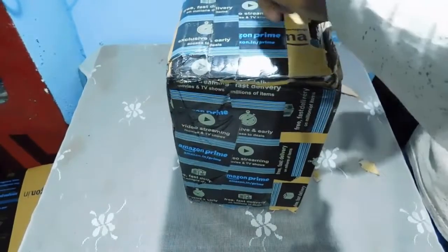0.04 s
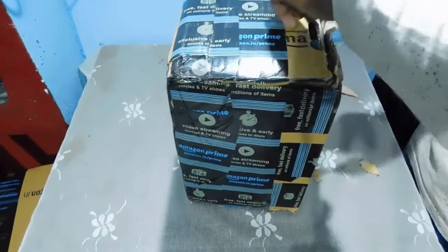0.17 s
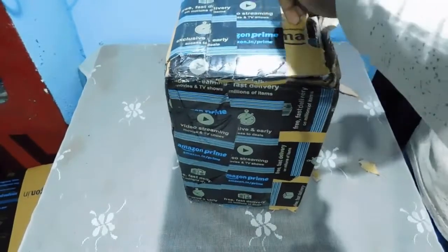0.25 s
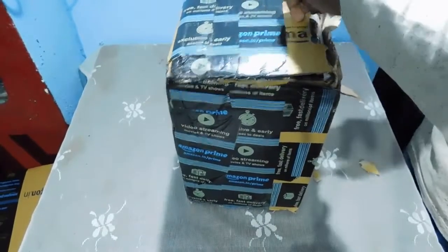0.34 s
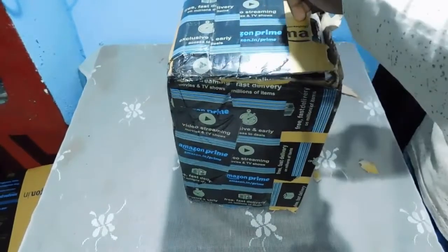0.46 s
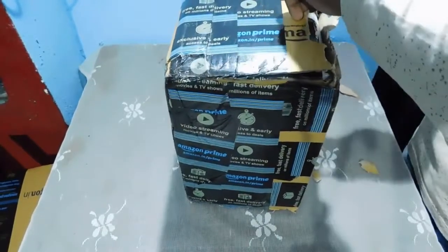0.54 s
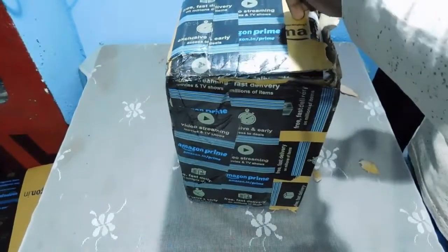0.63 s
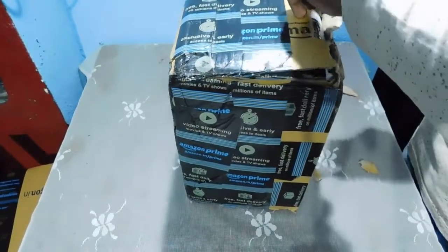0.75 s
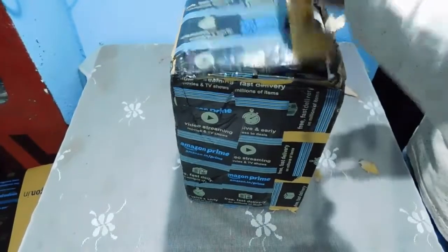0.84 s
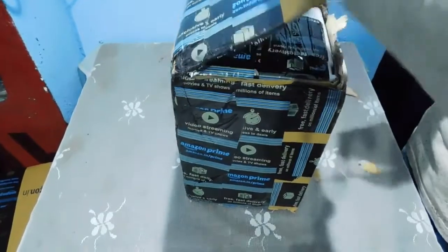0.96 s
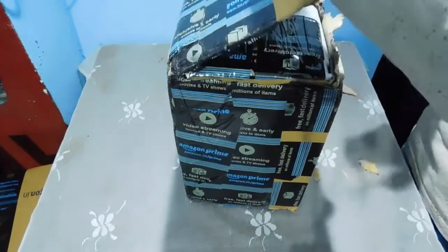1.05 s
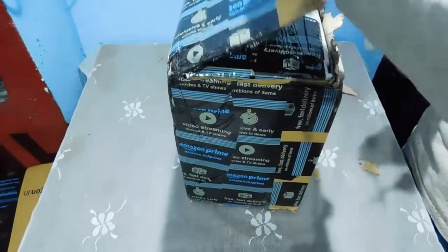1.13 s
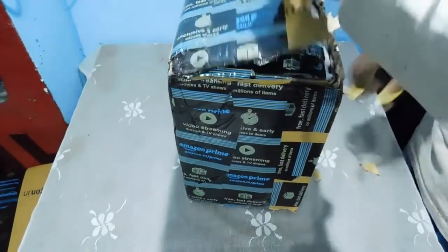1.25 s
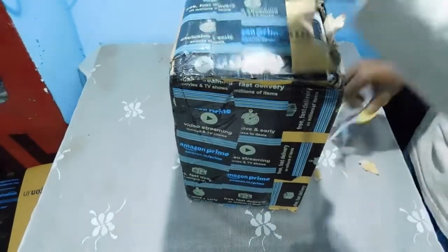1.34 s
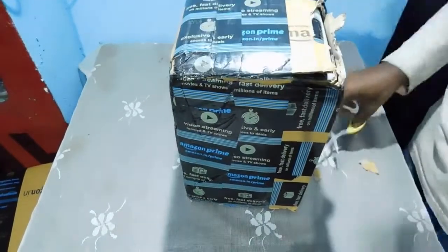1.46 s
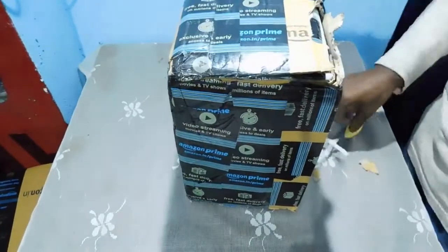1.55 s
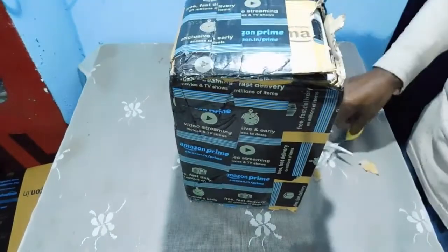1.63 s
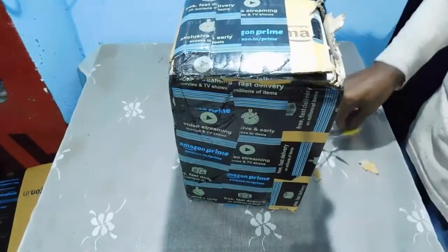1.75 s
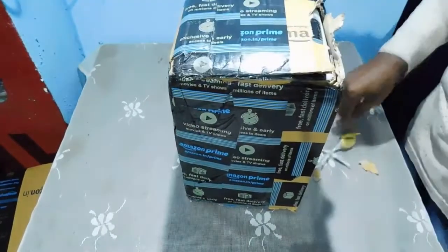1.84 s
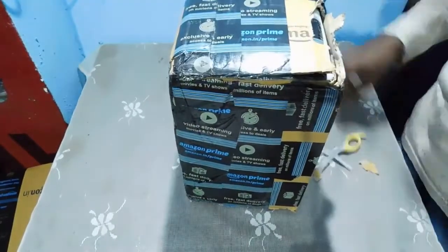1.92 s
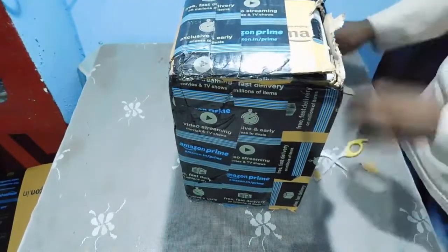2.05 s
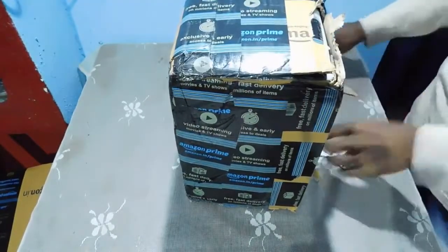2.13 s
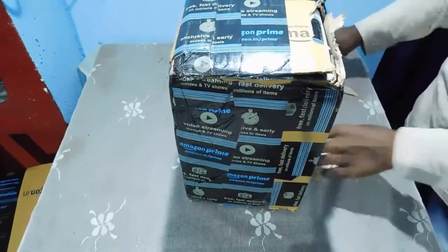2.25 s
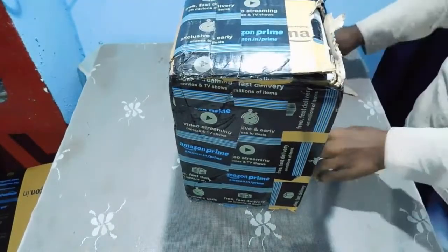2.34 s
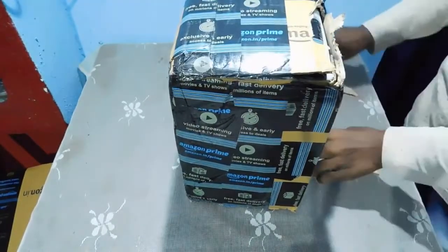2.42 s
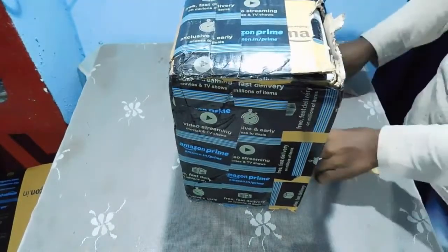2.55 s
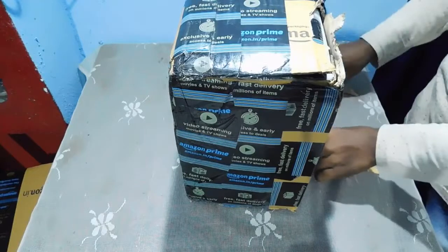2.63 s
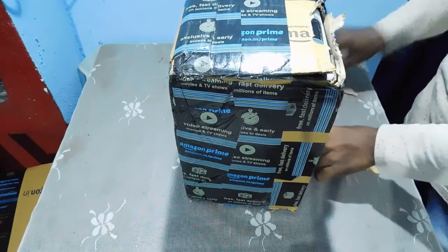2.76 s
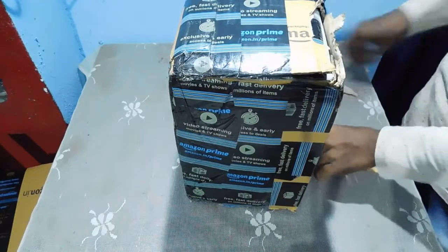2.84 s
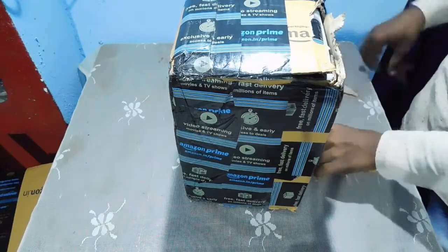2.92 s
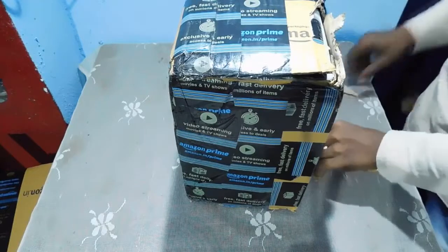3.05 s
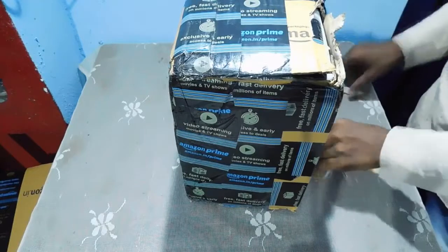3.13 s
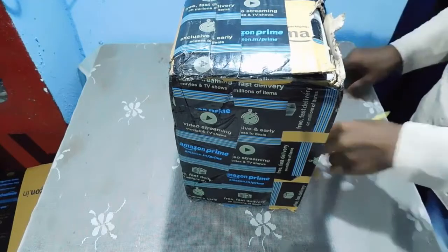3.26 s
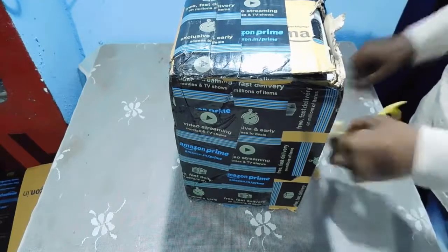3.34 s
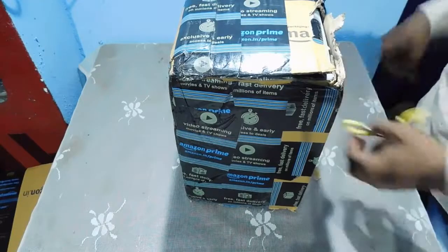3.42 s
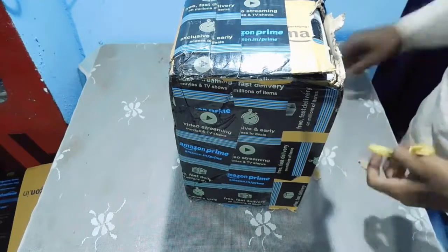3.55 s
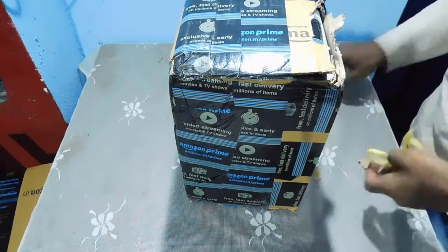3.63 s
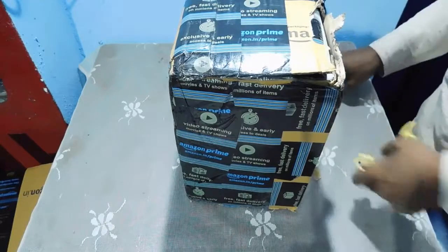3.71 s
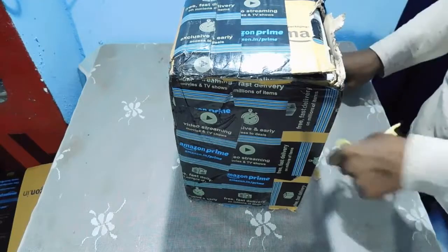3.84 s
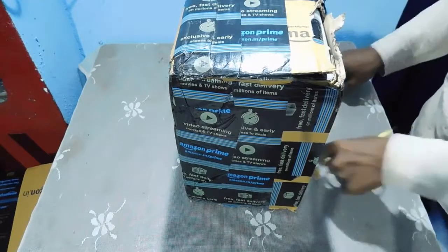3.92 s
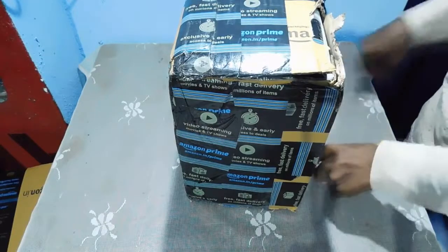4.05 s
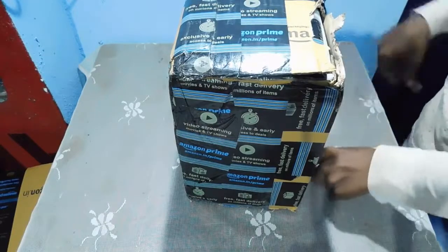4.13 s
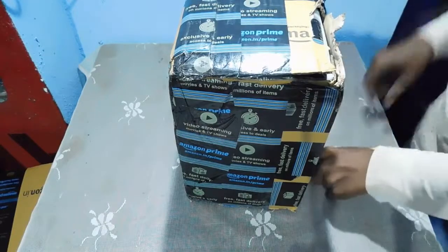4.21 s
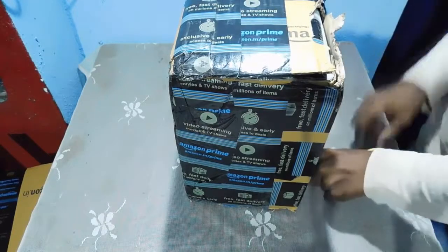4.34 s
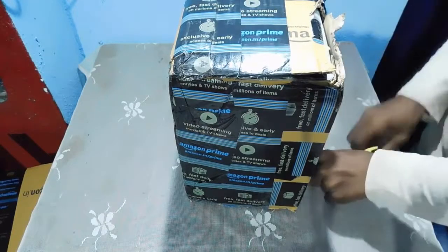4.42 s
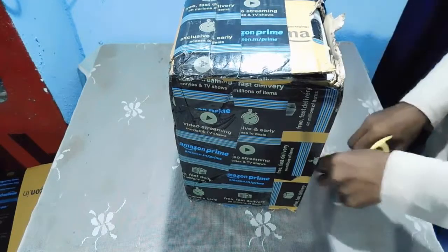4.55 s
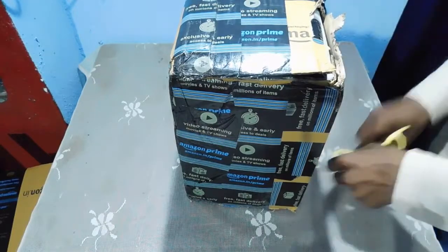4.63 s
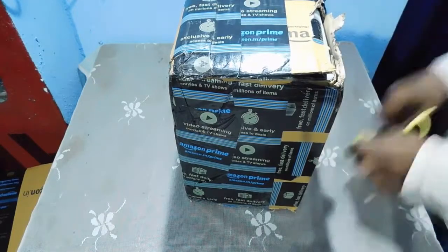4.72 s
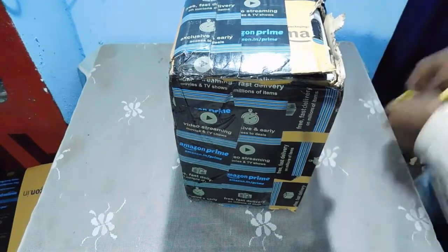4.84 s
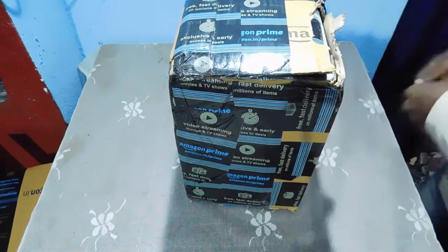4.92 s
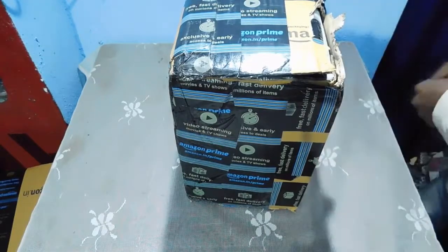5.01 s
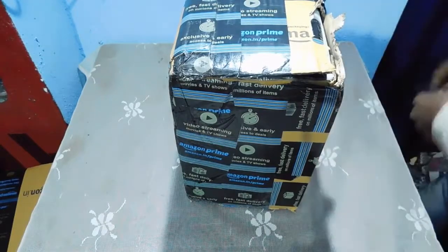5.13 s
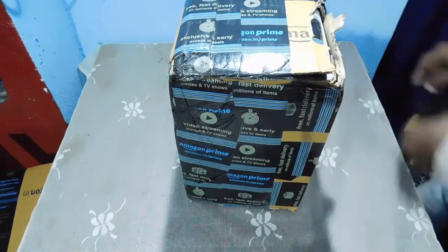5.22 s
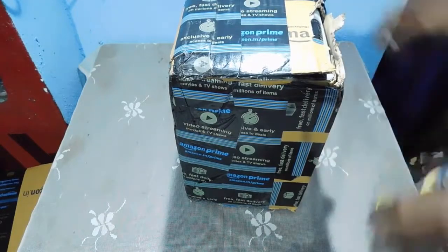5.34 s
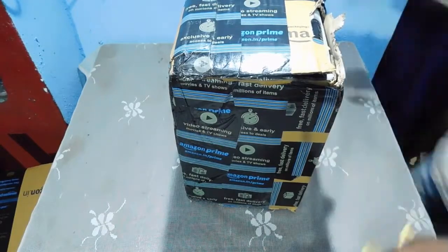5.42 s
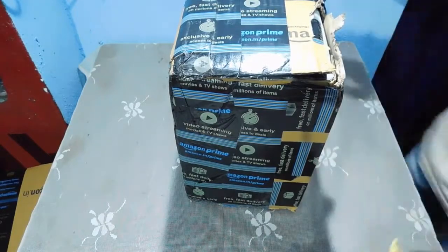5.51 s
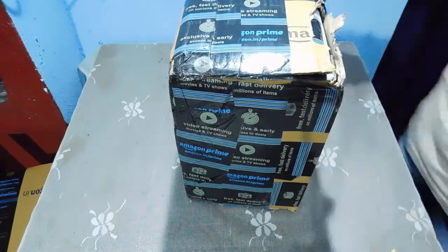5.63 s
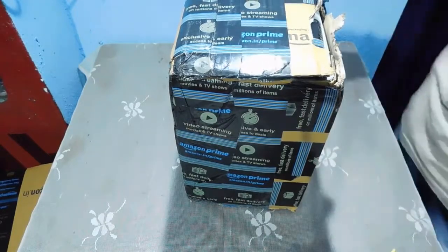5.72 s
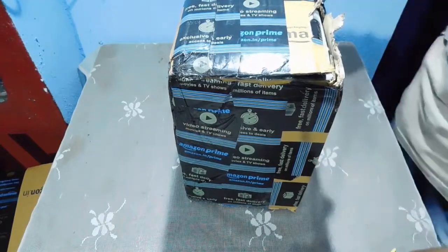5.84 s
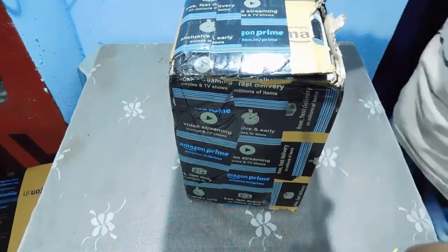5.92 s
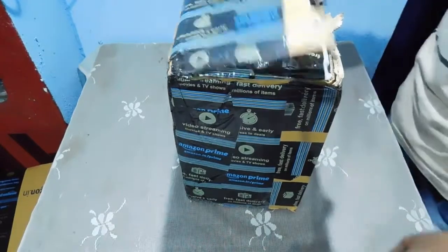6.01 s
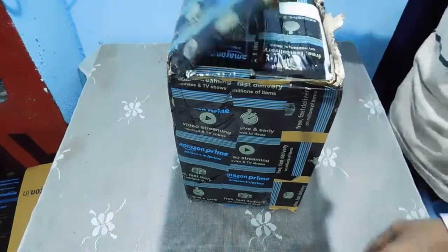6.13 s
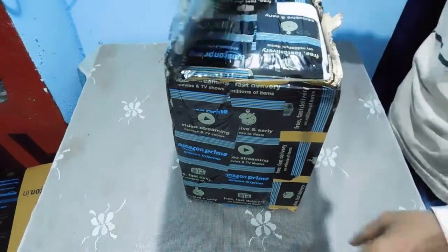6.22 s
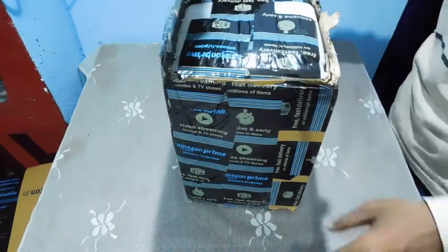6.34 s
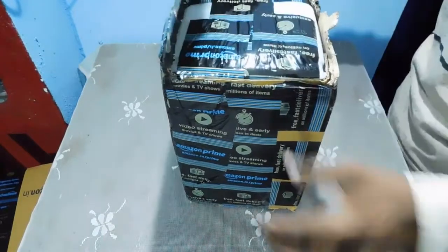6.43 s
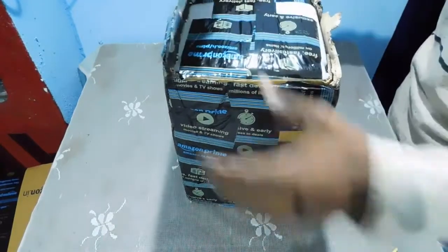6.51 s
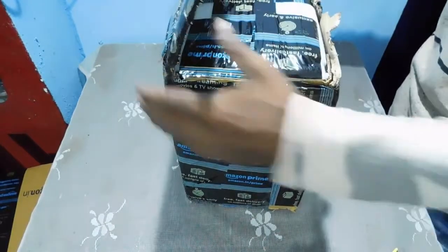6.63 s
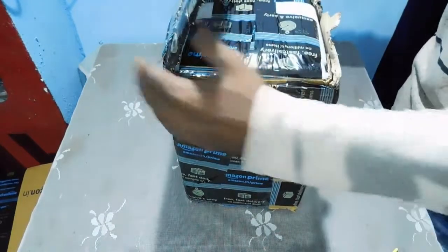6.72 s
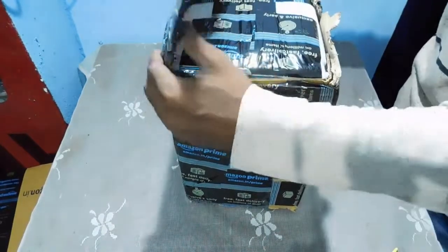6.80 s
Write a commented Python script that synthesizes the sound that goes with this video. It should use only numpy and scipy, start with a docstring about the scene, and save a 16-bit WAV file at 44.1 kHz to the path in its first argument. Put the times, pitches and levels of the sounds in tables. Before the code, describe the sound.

Over faint steady room hush, soft rasps and dull hollow bumps come from a cardboard box on a table. Tape and board pop and crackle, scissors land in a quick bouncing metallic clatter, then handling grows sparse and quiet. Late on, the scissors are put down with a bright knock and the flap folds with dense crisp snaps. Close, lively small-room sound.

```python
"""Hands rub and bump a taped cardboard box over a faint hush; the box is worked open on a table.
Throughout, tape and creased board snap; the flap cracks free early, and scissors clatter down
twice, near 1.7 s and 5.6 s. Rubs are noise gated by random slips, snaps short noise bursts with
a damped sine, bumps dying box modes, knocks chattering noise that rings table and steel.
A small hard-walled room, as decaying noise, rings on after every sound; two microphones hear it."""
import sys
import numpy as np
from scipy import signal
from scipy.fft import rfft, irfft, next_fast_len
from scipy.io import wavfile
from scipy.ndimage import uniform_filter1d

SR = 44100
rng = np.random.default_rng(int(sys.argv[2]) if len(sys.argv) > 2 else 0)


def dump(signal):
    """Clip the signal to [-1, 1] and save it as 16-bit WAV at the path in sys.argv[1]."""
    limited = np.clip(np.atleast_2d(signal).T, -1, 1)
    pcm = np.round(limited * 32767).astype(np.int16)
    wavfile.write(sys.argv[1], SR, pcm)


N = 302967

# All dB are relative.
# Flap cracking free, scissors bouncing on the table: t/s, level/dB, bass/dB, treble/dB,
# ring of struck spot f/Hz, room/dB, deep push/dB, ring of steel/dB
KNOCKS = [ (0.7555, -20, -18, -14, 1150, 0.5, -38, -36), (1.691, -23, -16.5, -13.5, 1050, 2, -51, -6),
          (1.878, -22.5, -8.5, -9.5, 1210, 2, -40, 4), (1.959, -5, -16.5, -18.5, 2400, -2, -39.5, -2),
          (1.987, -14.5, -46, -14, 2520, 5, -48, -19), (2.053, -10.5, -18, -15.5, 1770, 4.5, -37, 4),
          (2.075, -24, -15, -7.5, 1160, 7, -49, 9), (2.100, -21.5, -20, -13.5, 1590, 2.5, -54, 10),
          (2.134, -22, -16, -26, 1950, 3, -47, 4), (5.641, -27, -11, -4, 1500, 4.5, -41, -5),
          (5.919, -9.5, -16.5, -15, 2930, 3.5, -58, -9.5)]
# Snaps of tape and creased board: t/s, level/dB, treble/dB, ring of patch f/Hz
SNAPS = [(0.623, -34.5, -3, 1370), (0.682, -17.5, -31, 1880), (0.916, -23.5, -10, 984),
         (0.993, -23, 16, 1130), (1.003, -21, -5, 1628), (1.021, -31, -12, 1940), (1.055, -20.5, -4, 1610),
         (1.076, -23.5, -30, 1640), (1.176, -37.5, -14, 4060), (1.279, -31.5, -11.5, 1170),
         (1.331, -22, -6, 2060), (1.357, -22.5, 2, 1100), (1.365, -25, -1, 1600), (1.380, -20, -5, 1870),
         (1.392, -20, -2, 1530), (1.404, -24, -15, 1650), (1.722, -27, 2, 930), (2.789, -32.5, -10, 3000),
         (2.826, -18.5, 2, 2520), (3.457, -28, -15, 1260), (3.763, -37, 5, 1300), (5.027, -39.5, 4, 1490),
         (5.814, -23.5, -12.5, 2580), (5.903, -24, -4, 3050), (6.118, -19.5, -5, 1420),
         (6.153, -20, -6, 1610), (6.170, -21.5, -28, 1920), (6.198, -18.5, 3, 2570),
         (6.229, -21, -11, 1320), (6.239, -23, -3, 1370), (6.331, -13.5, -22, 2400),
         (6.337, -16, -18, 1940), (6.516, -26.5, 4, 5050), (6.524, -20.5, -3.5, 1240),
         (6.414, -32, -15, 1040), (6.596, -26, -12, 2590), (6.683, -35, -3, 1280),
         (6.828, -29.5, -15, 1040), (6.859, -20, -7, 2830)]
# Soft bumps of the hand on the box: t/s, level/dB, deep push/dB, pitch favoured by touched spot f/Hz
BUMPS = [(0.079, -61, -10, 130), (0.16, -44, -33, 623), (0.285, -53.5, -33, 320), (0.56, -51, -30, 560),
         (0.93, -38, -20, 433), (1.062, -41, -17, 340), (1.234, -54, 1, 140), (2.825, -54, -31, 298),
         (3.085, -48.5, -33, 265), (3.25, -54.5, -33, 259), (3.825, -44, -18, 342.8), (3.87, -53, -21, 201),
         (4.158, -44.5, -22, 267), (4.218, -47, -20, 278), (4.57, -56.5, -27, 260), (5.545, -51, -34, 660)]
# Strokes of hand, sleeve or blade over board: t/s, length/s, rasp/dB, fizz/dB, graininess/dB,
# swell from start to end/dB
STROKES = [ (0.0, 0.13, -50.5, -58, 2.5, 4), (0.11, 0.13, -46.5, -58, 3.5, -6),
           (0.275, 0.023, -40, -52.5, 2.5, 3.5), (0.36, .12, -48, -54.5, 1.5, 16.5),
           (0.48, 0.11, -46.5, -57.5, 3.5, -10), (0.65, .105, -45, -50, 4, 11),
           (0.84, 0.054, -53, -64, 1, 6), (0.888, 0.036, -38.5, -45, 1.5, 12.5),
           (0.935, .06, -48.5, -53, 4, -8), (1.0, 0.15, -46, -60, 7, -5), (1.17, .04, -63, -59, 7, 0),
           (1.272, .035, -47, -61, 4, -8), (1.355, .055, -44, -46.5, 3.5, -0.5),
           (1.675, 0.017, -56, -57, 2, 12), (1.852, 0.034, -28.5, -39, -0.5, 24),
           (1.905, 0.061, -33, -36.5, 0, 4), (1.948, 0.021, -20.5, -30.5, 2, 7),
           (2.03, .025, -32, -33, 2, 12), (2.32, 0.08, -51.5, -53, 1.5, 11.5), (2.53, .03, -59, -57, 2, -3),
           (2.605, .21, -58, -51.5, 3, 8.5), (2.822, 0.019, -44.5, -37.5, 2, -7),
           (3.25, 0.12, -58, -54, 3.5, 22), (3.36, 0.048, -52.5, -48, 3.5, -2),
           (3.435, 0.042, -45.5, -45, 4.5, 10.5), (3.62, 0.21, -61, -63.5, 2.5, -7),
           (3.92, .14, -63.5, -60, 3.5, -1), (4.2, 0.036, -52, -56, 4, 5),
           (4.35, 0.044, -54, -64.5, 3.5, 5), (4.52, 0.054, -66, -62.5, 2, 5),
           (4.62, 0.086, -62, -58, 0.5, 17), (4.71, 0.028, -51.5, -54, 4, 4), (4.93, 0.12, -60, -70, 4, 1),
           (5.205, 0.051, -55.5, -57.5, 3, 5), (5.415, 0.083, -56.5, -64, 1.5, -4),
           (5.53, 0.032, -53, -70, 5.5, -5), (5.615, 0.029, -52.5, -60, 4, 18),
           (5.825, 0.074, -43, -46.5, 2.5, 10), (6.1, .07, -48, -53, 4, 6), (6.19, .075, -48, -47, 4, -3),
           (6.315, .02, -33, -43, 5, 16), (6.4, .1, -59, -58, 0.5, 0), (6.51, 0.074, -53, -56, 7, -5),
           (6.755, 0.084, -50.5, -55, 1.5, -1), (6.822, 0.032, -43, -48, 6.5, 4)]
# Hollow modes of the box on the table: f/Hz, level/dB, t60/s
BOX_MODES = [(123, -7, 0.15), (159, -10, 0.091), (237, -1, .14), (268, -1.5, 0.13), (348, -5.5, 0.16),
             (379, -6, 0.15), (429, -5.5, 0.24), (483, -1.5, 0.073), (580, 6.5, 0.1), (644, -3, 0.28),
             (746, -3, 0.059)]
# Ring of the table top and what lies on it: f/Hz, level/dB, t60/s
TABLE_MODES = [(248, -10, 0.24), (360, -1.5, 0.24), (572, -1, 0.38), (670, -8, 0.13), (836, 1, 0.35),
               (1226, 0.5, 0.28), (1544, -3, 0.15), (1780, -20, 0.086), (1910, -14, 0.13),
               (1940, 4.5, 0.11), (2120, -37, 0.12), (2770, -30, 0.069), (2690, 9, 0.06), (3100, 1, 0.1)]
# Broad, bright resonances of the steel blades: f/Hz, width/Hz, level/dB
BLADE_MODES = [(7850, 200, 11), (10070, 600, 12), (12300, 470, 13.5), (12900, 380, 17), (14000, 520, 16),
               (15300, 1000, 13)]
# Spectra of knock, snap, rubbing and hush: f/Hz, density/dB per Hz
KNOCK_SPECTRUM = [(60, -45), (110, -21), (195, -19.5), (255, -8.5), (500, -6), (600, -2.5), (950, -5.5),
                  (2000, 1.5), (3200, -5.5), (4300, -11.5), (6400, -20.5), (9800, -22.5), (10900, -24),
                  (12700, -25), (16000, -24)]
SNAP_SPECTRUM = [(150, -33), (500, -28.5), (1200, 4.5), (2200, 7), (4000, 1.5), (8000, 0), (12000, -3),
                 (16000, -9)]
RUB_SPECTRUM = [(88, -68.5), (150, -29), (240, -19.5), (398, -13), (555, -9), (601, -2.5), (905, -6.5),
                (1600, -3.5), (3290, -11), (6390, -13), (6910, -12.5), (12700, -14), (16000, -18.5)]
AIR_SPECTRUM = [(15, -53), (25, -19), (123, -16.5), (242, -11), (476, -5), (575, -2), (1100, -3.5),
                (1330, 1), (1480, -5.5), (1700, -2.5), (2480, -8.5), (2840, -7), (4250, -14),
                (13200, -21.5), (16000, -24)]
# Room decay: f/Hz, t60/s
ROOM_T60 = [(100, 0.65), (250, 0.39), (600, 0.37), (1300, 0.42), (2500, 0.41), (5000, 0.42), (9000, 0.39),
            (16000, 0.29)]
# Likeness of the two microphones in diffuse sound, then in the hush: f/Hz, correlation/-1 to 1
LIKENESS = [(40, 0.36), (130, .94), (350, .94), (650, 0.9), (1400, 0.71), (2800, 0.17), (5500, -0.048),
            (16000, -0.025)]
AIR_LIKENESS = [(30, .3), (100, 0.29), (500, 0.3), (900, 0.23), (1500, 0.023), (16000, 0)]
# How far to the right the work goes on: t/s, lag of left microphone/s
BEARING = [(0, .00003), (1.3, .00001), (1.7, .00005), (2.05, .00002), (2.8, .00006), (5.3, .00012),
           (5.64, 0), (6.87, 0)]
# Left microphone relative to right: f/Hz, level/dB
MIC_LEAN = [(300, 0.69), (2800, -0.3), (5500, -0.87), (14000, -1.7)]

AIR_DB = -61.5
BUMP_ROOM_DB, RUB_ROOM_DB, SNAP_ROOM_DB = -2.5, -1.53, -6.5
SPOT_DB_PER_OCT = -9.5  # modes weaken away from the favoured pitch
THUD_DB = -9.5
SLIPS_PER_S, SLIP_DECAY_S = 1500, 0.0012  # mean rate; energy decay of one slip
STROKE_ATTACK_S, STROKE_RELEASE_S = 0.013, 0.0099
CHATTER_DECAY_S = 0.0034
EDGE_HZ = 16200  # band limit


def amp(db):
    """Decibels to gain."""
    return 10 ** (np.asarray(db) / 20)


def unit(x):
    """Scales every channel to energy 1."""
    return x / np.sqrt(np.sum(x ** 2, -1, keepdims=True) + 1e-30)


def read(points, hz):
    """Reads a table on a log-frequency axis."""
    f, value = np.transpose(points)
    return np.interp(np.log(hz + 1), np.log(f + 1), value)


def add(mix, s, sound):
    """Lays a sound into the mix at time s, cut at the end."""
    part = mix[:, round(s * SR):][:, :sound.shape[1]]
    part += sound[:, :part.shape[1]]


def band(x, hz, kind):
    """Causal low-, high- or band-pass."""
    sos = signal.butter(4, hz, kind, fs=SR, output="sos")
    return signal.sosfilt(sos, x)


def resonate(x, hz, q):
    """One resonance driven by x."""
    b, a = signal.iirpeak(hz, q, fs=SR)
    return signal.lfilter(b, a, x)


def colour(x, points, size=2048):
    """Minimum-phase, hence causal, filter with the given spectrum."""
    hz = abs(np.fft.fftfreq(size, 1 / SR))
    log_gain = np.log(amp(np.maximum(read(points, hz), -100)))
    taps = np.fft.ifft(np.exp(np.conj(signal.hilbert(log_gain)))).real
    return signal.oaconvolve(x, unit(taps)[None], axes=1)[:, :x.shape[1]]


def diffuse(size, likeness=LIKENESS):
    """Noise from all sides: most alike at both microphones in the bass, unrelated in the treble."""
    a, b = rfft(rng.standard_normal((2, size)))
    same = np.clip(read(likeness, np.fft.rfftfreq(size, 1 / SR)), -1, 1)
    return irfft([a, same * a + np.sqrt(1 - same ** 2) * b], size)


def near(size, spread):
    """Noise from a close source: a common part and a scattered share."""
    return rng.standard_normal(size) + spread * diffuse(size)


def burst(envelope, spread, focus=1):
    """Noise rows left, right, room feed; focus adds a click to the feed and smooths its spectrum."""
    direct = unit(near(len(envelope), spread) * envelope)
    feed = 0.72 * direct[0]
    feed[np.argmax(envelope)] += focus
    return np.vstack([direct, unit(feed)])


def ring(modes, t):
    """Dying sines; each blow lands on another spot and so in another phase."""
    total = 0
    for hz, db, t60 in modes:
        decay = amp(db - 60 * t / t60)
        total = total + decay * np.sin(2 * np.pi * (hz * t + rng.random()))
    return unit(total)


def placed(x, s):
    """A sound from the right reaches the left microphone late."""
    size = next_fast_len(x.shape[1])
    hz = np.fft.rfftfreq(size, 1 / SR)
    lag_s = np.interp(s, *np.transpose(BEARING))
    z = rfft(x, size)
    z[0] *= np.exp(-2j * np.pi * hz * lag_s)
    return irfft(z, size)


def air():
    """Steady background hush of the room: coloured diffuse noise."""
    noise = colour(diffuse(N, AIR_LIKENESS), AIR_SPECTRUM, size=8192)
    return amp(AIR_DB) * np.sqrt(N) * unit(noise)


def room(x, size=24576):
    """A dense tail that builds up within milliseconds and dies soonest at the top."""
    hz, t, z = signal.stft(diffuse(size), SR, nperseg=256)
    decay = amp(-60 * t / read(ROOM_T60, hz)[:, None])
    tail = signal.istft(z * decay, SR, nperseg=256)[1][:, :size]
    tail *= 1 - np.exp(-(np.arange(size) / SR / 0.005) ** 2)
    return signal.fftconvolve(x, unit(tail), axes=1)[:, :N]


def push(t):
    """The low, ringless give of the table."""
    return unit(band(burst(np.exp(-t / 0.022), 0.34), [28, 170], "band"))


def bump(level_db, push_db, hz, size=12000):
    """A soft blow thuds, rings the hollow box and pushes the table."""
    t = np.arange(size) / SR
    modes = [(f, db + SPOT_DB_PER_OCT * abs(np.log2(f / hz)), t60) for f, db, t60 in BOX_MODES]
    hollow = unit(ring(modes, t) * (1 - np.exp(-t / 0.0018)))
    thud = unit(band(burst(np.exp(-t / 0.012), 0.35), [hz * 0.707, hz * 1.6], "band"))
    blow = hollow + amp(THUD_DB) * thud + amp(push_db - 1) * push(t)
    return amp(level_db + 20.0) * blow, BUMP_ROOM_DB


def stroke(length_s, rasp_db, fizz_db, grain_db, swell_db, size=16384):
    """Fibres catch and slip: a dense rasp of uneven grains with scattered larger ticks."""
    t = np.arange(size) / SR
    attack = np.minimum(t / STROKE_ATTACK_S, 1)
    swell = amp(swell_db * (np.minimum(t / length_s, 1) - 0.5))
    release = np.exp(-np.maximum(t - length_s, 0) / STROKE_RELEASE_S)
    pressure = attack * swell * release
    strength = amp(grain_db * np.minimum(rng.exponential(1, size), 5))
    slips = (rng.random(size) < SLIPS_PER_S / SR) * strength
    energy = signal.lfilter([1], [1, -np.exp(-1 / (SLIP_DECAY_S * SR))], slips ** 2)
    grip = np.sqrt(energy / (uniform_filter1d(energy, 3000) + 1e-6))  # levels the running mean
    grains = colour(burst(grip, 0.82, focus=0), RUB_SPECTRUM)
    rasp = amp(rasp_db - 9.0) * unit(band(grains, 4150, "low"))
    fizz = amp(fizz_db - 5.0) * unit(band(grains, 2760, "high"))
    return np.sqrt(size) * pressure * (rasp + fizz), RUB_ROOM_DB


def snap(level_db, treble_db, hz, size=2048):
    """A crease gives way in about a millisecond; the patch around it rings briefly and settles."""
    t = np.arange(size) / SR
    slip = np.exp(-t / 0.0015) * (1 - np.exp(-t / 0.00046))
    settling = amp(-18.5) * np.exp(-t / 0.029)
    crack = unit(colour(burst(slip + settling, 0.32), SNAP_SPECTRUM))
    patch_envelope = np.exp(-t / 0.0017) * (1 - np.exp(-t / 0.00062))
    patch = unit(np.sin(2 * np.pi * hz * t) * patch_envelope)
    body = unit(band(crack, 4260, "low") + amp(-2.5) * patch)
    treble = amp(treble_db + 3.0) * unit(band(crack, 5200, "high"))
    return amp(level_db + 7.5) * unit(body + treble), SNAP_ROOM_DB


def knock(level_db, bass_db, treble_db, hz, room_db, push_db, steel_db, size=8192):
    """A few milliseconds of chattering contact set the table and the blades ringing."""
    t = np.arange(size) / SR
    contact = np.exp(-t / CHATTER_DECAY_S) * (1 - np.exp(-t / 0.00026))
    rattle = amp(-24) * np.exp(-t / 0.038)
    blow = unit(colour(burst(contact + rattle, 0.48), KNOCK_SPECTRUM))
    spot = unit(resonate(blow, hz, 4.0))
    steel = sum(amp(db) * resonate(blow, f, f / width) for f, width, db in BLADE_MODES)
    blow = blow + amp(-12.0) * ring(TABLE_MODES, t) + amp(-1.5) * spot + amp(steel_db) * steel
    bass = amp(bass_db + 7) * unit(band(blow, 770, "low"))
    body = unit(band(blow, [600, 4000], "band"))
    treble = amp(treble_db + 10) * unit(band(blow, 4800, "high"))
    return amp(level_db + 13.5) * (bass + body + treble + amp(push_db) * push(t)), room_db


def scene(paths=4):
    """All handling sounds over the hush; successive blows reach the room by different paths."""
    mix, sends = air(), np.zeros((paths, 1, N))
    for table, source in (BUMPS, bump), (STROKES, stroke), (SNAPS, snap), (KNOCKS, knock):
        for k, (s, *settings) in enumerate(table):
            sound, room_db = source(*settings)
            add(mix, s, placed(sound[:2], s))
            add(sends[k % paths], s, amp(room_db) * sound[2:])
    return mix + sum(room(send) for send in sends)


def record(dry):
    """The right microphone is a little brighter; then the band limit."""
    lean_db = read(MIC_LEAN, np.fft.rfftfreq(N, 1 / SR))
    heard = irfft(rfft(dry) * amp(np.array([[0.5], [-0.5]]) * lean_db), N)
    lowpass = signal.firwin(301, EDGE_HZ, window=("kaiser", 9), fs=SR)
    return signal.oaconvolve(heard, lowpass[None], "same")


dry = scene()
out = record(dry)
dump(out)
```